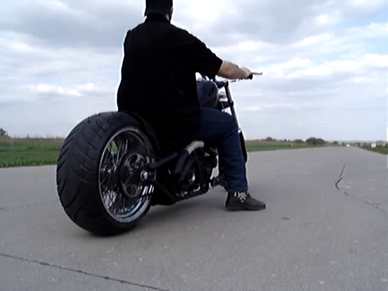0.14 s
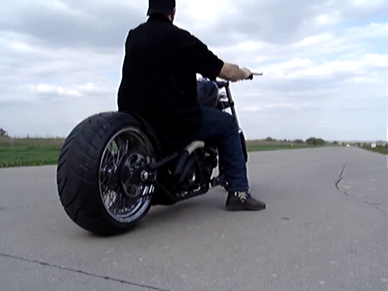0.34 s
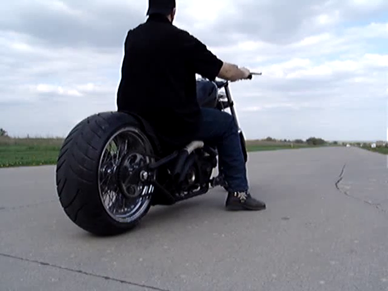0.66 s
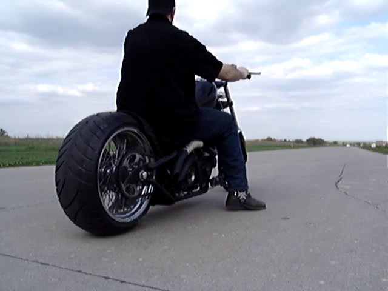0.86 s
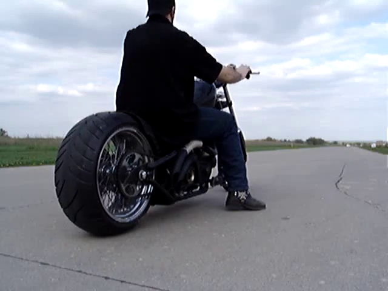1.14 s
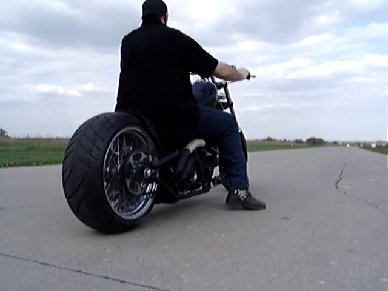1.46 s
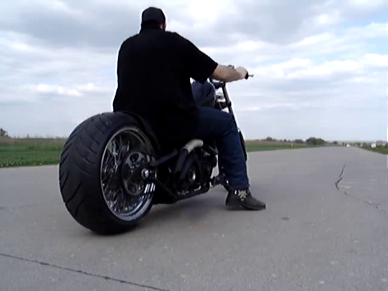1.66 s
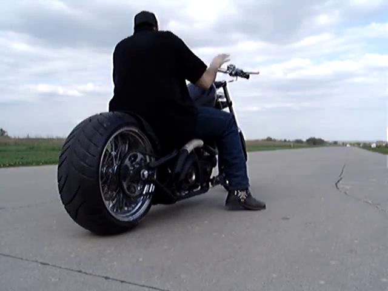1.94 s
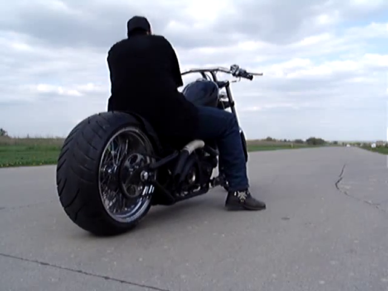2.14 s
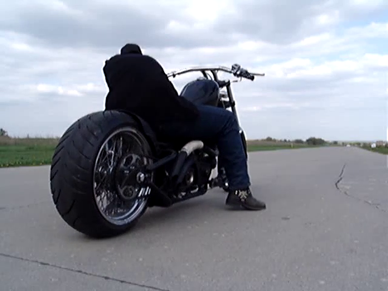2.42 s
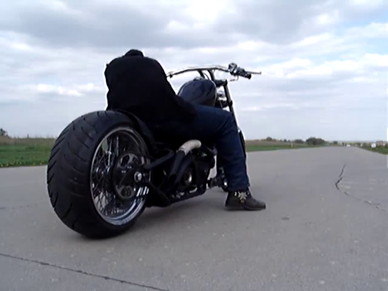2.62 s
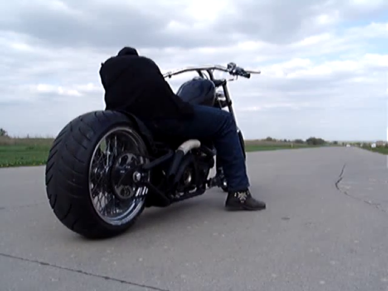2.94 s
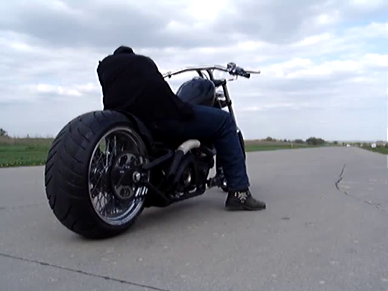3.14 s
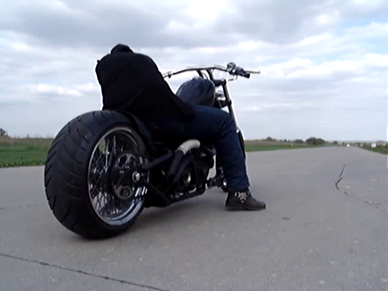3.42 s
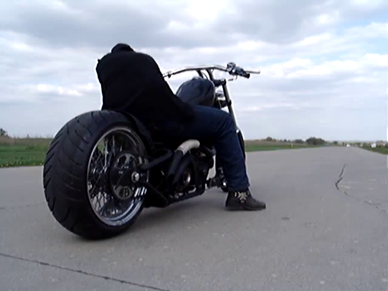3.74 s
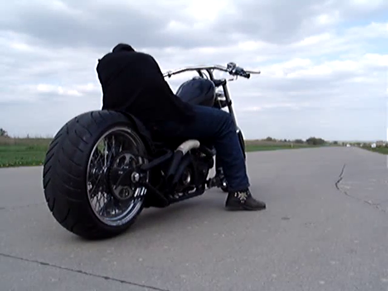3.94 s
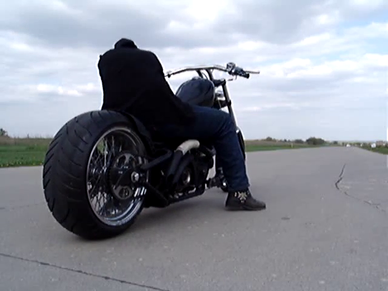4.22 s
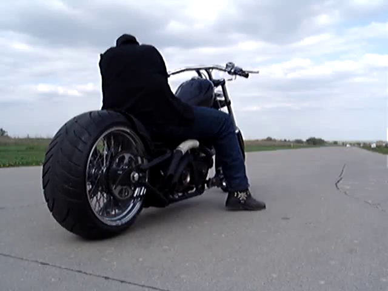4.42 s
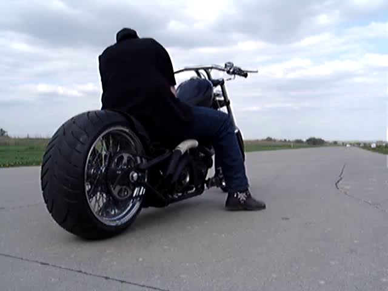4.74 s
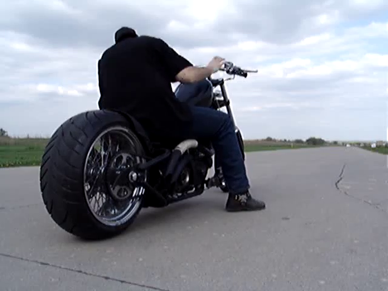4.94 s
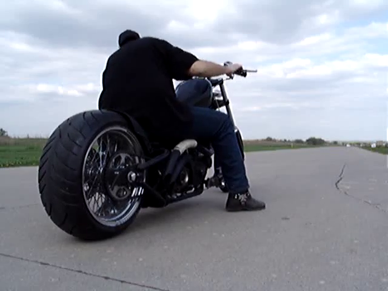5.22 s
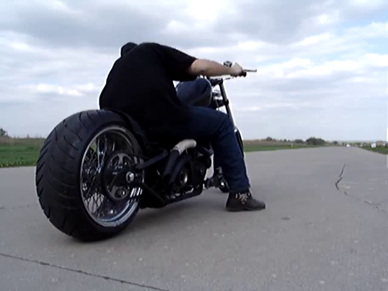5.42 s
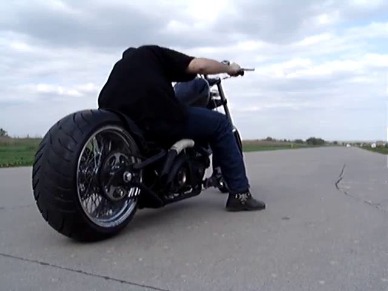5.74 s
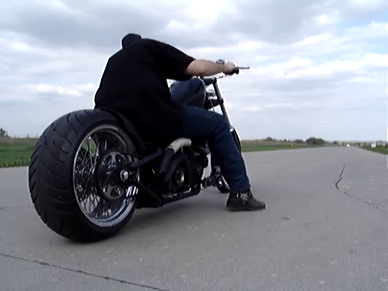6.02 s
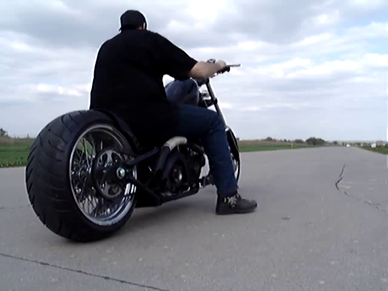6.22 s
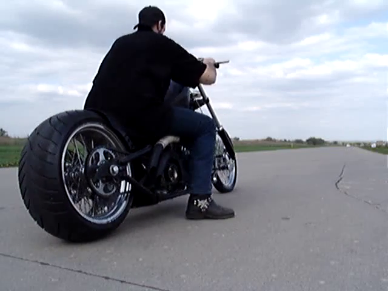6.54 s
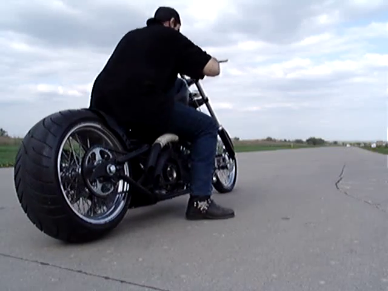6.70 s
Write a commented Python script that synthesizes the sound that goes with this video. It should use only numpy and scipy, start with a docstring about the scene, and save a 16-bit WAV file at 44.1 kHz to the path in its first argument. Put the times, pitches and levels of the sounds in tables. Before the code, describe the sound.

A large twin-cylinder motorcycle idles on an open road, a few metres from a small microphone. Short open pipes crack sharply about eight times a second, each pop bright and dry over a brief hollow boom. The second cylinder mostly gives soft puffs, sometimes a quick double pop. Low gulping tones slide upward between beats, and engine clatter flutters behind. It never revs up or pulls away.

```python
"""A big V-twin motorcycle idles with a lope on an open road, a few metres from a small microphone.
Each firing cracks out of a short open pipe as a jet of noise and sets its air column ringing.
The first cylinder sets the beat and seldom misses; the second mostly gives only a soft puff of noise.
Late in every engine cycle the pipes gulp, a tone sliding up to a crest, heavily about every fourth time.
Behind lie the engine's clatter and hiss, one knock of the pipe wall, and air rumbling past the microphone."""
import sys
import numpy as np
from scipy import signal
from scipy.fft import rfft, irfft
from scipy.io import wavfile
from scipy.ndimage import uniform_filter1d

SR = 44100
rng = np.random.default_rng(int(sys.argv[2]) if len(sys.argv) > 2 else 0)


def materialize(psi):
    """Save the field psi as 16-bit PCM at rate SR to the path in sys.argv[1].

    A 1-D psi becomes a single channel; in a 2-D psi each row is a channel.
    """
    bounded = np.clip(np.atleast_2d(psi).T, -1, 1)
    quanta = np.round(bounded * 32767).astype(np.int16)
    wavfile.write(sys.argv[1], SR, quanta)


N = 302967  # samples

# Full firings: start_s, cylinder (1 or 2), relative level_db, bark pitch_hz
FIRINGS = [(0.069, 1, -17.5, 2560), (0.184, 1, -27.5, 3620), (0.235, 2, -17.5, 4160), (0.302, 1, -14, 3540),
           (0.532, 1, -13.5, 3500), (0.757, 1, -13.5, 3460), (0.984, 1, -13.5, 3380),
           (1.093, 1, -13.5, 3340), (1.209, 1, -13.5, 3470), (1.34, 1, -15.5, 3460),
           (1.406, 2, -15.5, 2800), (1.509, 1, -15.5, 3370), (1.65, 1, -11.5, 3630), (1.78, 1, -11.5, 3350),
           (1.917, 1, -12.5, 3400), (1.973, 2, -18.5, 3400), (2.049, 1, -14, 3230), (2.18, 1, -17.5, 2650),
           (2.321, 1, -14.5, 3730), (2.372, 2, -17, 3530), (2.44, 1, -17.5, 2700), (2.567, 1, -13, 2610),
           (2.69, 1, -15.5, 3320), (2.814, 1, -15, 2330), (2.865, 2, -32.5, 3000), (2.936, 1, -11.5, 3400),
           (3.065, 1, -13, 3250), (3.198, 1, -14.5, 2360), (3.248, 2, -19, 2740), (3.313, 1, -16, 3150),
           (3.436, 1, -14, 2650), (3.553, 1, -19.5, 3400), (3.677, 1, -15, 2750), (3.727, 2, -33.5, 2980),
           (3.91, 1, -12.5, 3320), (4.022, 1, -12.5, 2170), (4.136, 1, -16, 2260), (4.184, 2, -18.5, 2620),
           (4.247, 1, -13, 2650), (4.364, 1, -17, 2570), (4.489, 1, -15.5, 2740), (4.606, 1, -24, 2080),
           (4.73, 1, -13, 3280), (4.778, 2, -17, 3310), (4.841, 1, -13.5, 2620), (4.958, 1, -12.5, 3330),
           (5.077, 1, -18.5, 2180), (5.205, 1, -12, 2860), (5.254, 2, -15, 3900), (5.322, 1, -14.5, 3420),
           (5.441, 1, -14, 3520), (5.567, 1, -22, 2840), (5.701, 1, -13.5, 2730), (5.959, 1, -15, 2460),
           (6.009, 2, -20, 2720), (6.075, 1, -19.5, 2160), (6.198, 1, -14.5, 2580), (6.319, 1, -12, 2730),
           (6.443, 1, -14, 3150), (6.567, 1, -12.5, 2640), (6.752, 2, -21, 1840), (6.83, 1, -12, 1900)]

# Spectra of the firing's gas noises, before scaling: pitch_hz, relative level_db
BARK_SPECTRUM = [(150, -52.5), (400, -7), (750, -9.5), (1300, -22), (1700, -12.5), (2200, -9), (2700, -5.5),
                 (3450, -4.5), (4200, -10.5), (5500, -15), (9000, -27)]
SIZZLE_SPECTRUM = [(2500, -14.5), (4200, -8.5), (5200, 11), (6500, 9.5), (7400, 12), (9700, 8),
                   (12000, -27)]
AFTERFLOW_SPECTRUM = [(120, -23.5), (400, 8), (750, 9), (1300, 21), (2100, 27), (3500, -1), (5200, -9),
                      (7000, -31.5), (10000, -36.5)]
# Cross modes of the pipe, rung by the streaming gas: pitch_hz, width_hz, relative level_db
CROSS_MODES = [(1077, 37, 10.5), (2180, 44, 9), (2560, 115, 9)]
# Odd quarter-wave modes of the pipe, rising as the piston comes up, before the scatter of each firing:
# first pitch_hz, pitch_hz after one stroke, relative level_db
PIPE_MODES = [(82.7, 122, -4), (199.7, 362, -3), (410.3, 545, -14.5), (586, 640, -17.5), (742.4, 860, -17)]

# Spectrum of the soft puffs: pitch_hz, relative level_db
PUFF_SPECTRUM = [(300, -15.5), (1200, -9.5), (2200, 7), (3300, 8), (5000, 1.5), (8000, 1.5), (10000, 0.5)]
# Heavy gulps of the lope: crest_s, relative level_db
HEAVY_GULPS = [(0.269, -18), (0.835, -19), (1.454, -29.5), (1.741, -22.5), (2.008, -22.5), (2.404, -20),
               (2.898, -17.5), (3.279, -18.5), (3.755, -17.5), (4.216, -19), (4.81, -20), (5.287, -20),
               (5.66, -26.5), (6.04, -17.5), (6.406, -23.5), (6.794, -20.5)]
# Spectrum of the gas rushing in a gulp: pitch_hz, relative level_db
RUSH_SPECTRUM = [(120, -3.5), (300, -7.5), (430, -1), (750, -22), (1300, -28), (5000, -49)]
# Modes of the knocked pipe wall: pitch_hz, level_db, time to fall 60 dB t60_s
WALL_MODES = [(780, -13.5, 0.052), (1226, -11, 0.044), (1530, -22, 0.072)]

# Spectra of the engine wash, the gas hiss and the air at the microphone: pitch_hz, relative level_db
CLATTER_SPECTRUM = [(20, -16), (42, -22.5), (65, -7), (95, 6), (170, 2), (260, 0), (380, 0), (750, -4.5),
                    (1000, -11.5), (1230, -11), (1500, -11), (3200, -24.5), (5500, -59), (10000, -62.5)]
HISS_SPECTRUM = [(1500, -23.0), (3500, 19.5), (6000, 1), (10000, -5)]
RUMBLE_SPECTRUM = [(10, -6), (25, -2.0), (45, -3.5), (90, -25.5), (400, -83.0)]

CYCLE_S = 0.123  # one engine cycle (two turns of the crank) at the usual idle speed
# Sizzle against the bark (dB): first cylinder, second, and the first when it fires just after the second
SIZZLE_FIRST_DB, SIZZLE_SECOND_DB, SIZZLE_AFTER_DB = -2.0, 2.5, -4.0
BOOM_FIRST_DB, BOOM_SECOND_DB = -21.5, -27.0
# Puffs come at a set share of every cycle, or at its start when the first cylinder misses
PUFF_SHARE, PUFF_DB, MISFIRE_DB, PUFF_SCATTER_DB = 0.443, -33.5, -39.5, 5
# Ordinary gulps grow as the engine speeds up (dB per cycle a second); levels on the scale of HEAVY_GULPS
GULP_SHARE, GULP_DB, GULP_DB_PER_RATE, GULP_SCATTER_DB = 0.718, -32, 4, 1.5
# A stronger gulp crests higher: mean pitch at GULP_DB, and its rise
GULP_HZ, GULP_HZ_PER_DB = 165.2, 2.5
KNOCK_S = 2.373


def cracks(sputter_db=2.5):
    """The valve opens: a sputtering jet barks and sizzles for a few ms, then duller gas streams after it."""
    t, out = around(), np.zeros(N)
    previous_s = -1
    for start_s, cylinder, level_db, bark_hz in FIRINGS:
        if round(cylinder) == 2:
            sizzle_offset_db = SIZZLE_SECOND_DB
        elif start_s - previous_s < .07:
            sizzle_offset_db = SIZZLE_AFTER_DB
        else:
            sizzle_offset_db = SIZZLE_FIRST_DB
        sputter = amp(sputter_db * wobble(len(t), count=40))

        jet = noise(BARK_SPECTRUM, len(t)) * burst(t, at=0.0012, rise=0.00079, fall=0.0043) * sputter
        bark = levelled(jet + 2.0 * resonate(jet, bark_hz, width=167), level_db + 1.42)

        fizz = noise(SIZZLE_SPECTRUM, len(t)) * burst(t, at=0.0022, rise=0.00079, fall=0.0023) * sputter
        # each fizz is tinted by one narrow resonance at a random high pitch
        tint = resonate(fizz, rng.uniform(4510, 9880), width=320)
        sizzle = levelled(fizz + 3.45 * tint, level_db + sizzle_offset_db)

        stream = noise(AFTERFLOW_SPECTRUM, len(t)) * burst(t, at=0.0012, rise=0.0011, fall=0.0095)
        rung = sum(amp(db) * resonate(stream, hz, width) for hz, width, db in CROSS_MODES)
        # the afterflow varies only half as much in dB as the bark
        afterflow = levelled(pipe_echo(stream + rung), 0.5 * level_db - 16.0)

        add(out, start_s, bark + sizzle + afterflow)
        previous_s = start_s
    return out


def pipe_echo(x, trip=.006, kept=0.22):
    """Sound runs up and down the pipe (trip in s) and flips its sign at the open end."""
    delay = round(trip * SR)
    return sum((-kept) ** k * np.pad(x, (k * delay, 0))[:len(x)] for k in range(5))


def booms(stroke=0.0394, lead=0.0013, thud_hz=150, front_hz=700, waver=.05):
    """The pressure front rings the pipe; its suction echo thuds, and a second thud follows as the valve closes."""
    t, out = around(), np.zeros(N)
    age = np.maximum(t + lead, 0)
    swell = 1 - np.exp(-age / 0.0054)
    held = swell / (1 + np.exp((age - stroke - .004) / 0.0094))

    def thud(at, length):
        return -np.cos(2 * np.pi * thud_hz * (t - at)) * np.exp(-((t - at) / length) ** 2)

    suction = amp(-0.5) * thud(at=0.0062, length=0.0027)
    closing = amp(1.5) * thud(at=0.0293, length=0.0041)
    for start_s, cylinder, _, _ in FIRINGS:
        # each mode's pitch is scattered a little on its own from firing to firing
        detune = 1 + 0.0457 * rng.standard_normal(len(PIPE_MODES))
        ring = np.zeros(len(t))
        for (low_hz, high_hz, db), factor in zip(PIPE_MODES, detune):
            rising_hz = low_hz + (high_hz - low_hz) * np.minimum(age / stroke, 1.2)
            hz = factor * rising_hz * (1 + waver * wobble(len(t), count=300))
            phase = 2 * np.pi * np.cumsum(hz * (age > 0)) / SR
            ring += amp(db + 2 * rng.standard_normal()) * np.cos(phase)
        # the front's pitch scatters along with the lowest mode, about twice as far
        front = np.sin(2 * np.pi * front_hz * detune[0] ** 2 * age) * np.exp(-age / 0.012)
        # the second cylinder, right after the first, meets a pipe that is already flowing and booms less
        boom_db = BOOM_SECOND_DB if round(cylinder) == 2 else BOOM_FIRST_DB
        add(out, start_s, amp(boom_db) * (ring * held + suction + closing) + amp(-29.0) * front)
    return out


def gulps(ring_hz=175, slide=0.029, steepening=0.52):
    """The closing valve pulls the air column up in pitch; it crests, then rings on in the shut pipe."""
    t, out = around(), np.zeros(N)
    skirt = np.exp(-abs(t) / 0.024)
    crest = np.exp(-((t + 0.0003) / 0.0042) ** 2)
    ordinary = each_cycle(GULP_SHARE, GULP_DB, GULP_SCATTER_DB, unless=HEAVY_GULPS,
                          db_per_rate=GULP_DB_PER_RATE)
    for crest_s, db in list(HEAVY_GULPS) + ordinary:
        crest_hz = GULP_HZ + GULP_HZ_PER_DB * (db - GULP_DB) + 7 * rng.standard_normal()
        hz = np.where(t < .005, crest_hz * np.exp(np.minimum(t, 0) / slide), ring_hz)
        turns = np.cumsum(np.maximum(hz, 85)) / SR
        angle = 2 * np.pi * (turns - turns[np.argmin(abs(t))])  # zero at the crest

        peaked = np.clip(0.64 + 0.042 * (db + 22.5), 0, .9)  # strong gulps gather into one short crest
        height = amp(db + 10.0) * (peaked * crest + (1 - peaked) * skirt)
        pointed = steepening * height ** 2 * np.cos(3 * angle)  # strong waves grow pointed
        wave = height * np.cos(angle) + pointed

        rush = noise(RUSH_SPECTRUM, len(t)) * burst(t, at=-0.0042, rise=0.014, fall=0.0082)
        add(out, crest_s, wave + amp(0.45 * db - 21.5) * rush)
    return out


def puffs(ping_hz=1240):
    """A weak charge leaves the pipe as a longer, soft hiss; its valve pings faintly."""
    t, out = around(), np.zeros(N)
    leak = burst(t, at=0.00096, rise=.0016, fall=0.01)
    ping = np.sin(2 * np.pi * ping_hz * t) * burst(t, at=0.0011, rise=.0005, fall=0.009)
    misfires = each_cycle(0, MISFIRE_DB, PUFF_SCATTER_DB, unless=FIRINGS)
    soft = each_cycle(PUFF_SHARE, PUFF_DB, PUFF_SCATTER_DB, unless=FIRINGS)
    for start_s, db in misfires + soft:
        add(out, start_s, amp(db) * noise(PUFF_SPECTRUM, len(t)) * leak + amp(-46) * ping)
    return out


def knock():
    """One firing knocks the pipe wall, whose modes ring briefly as decaying sines."""
    t, out = around(), np.zeros(N)
    age = np.maximum(t, 0)
    ring = sum(amp(db - 60 * age / t60) * np.sin(2 * np.pi * hz * age) for hz, db, t60 in WALL_MODES)
    add(out, KNOCK_S, ring)
    return out


def clatter(wash_db=-34.5, flutter_db=3.0, hiss_db=-56, hiss_flutter_db=5.5):
    """Valve gear, chain and gas flow: a wash and a fainter hiss of noise that flutter together."""
    flutter = unit(uniform_filter1d(uniform_filter1d(rng.standard_normal(N), 500), 200))
    hiss = amp(hiss_db + hiss_flutter_db * flutter) * noise(HISS_SPECTRUM, N)
    wash = amp(wash_db + flutter_db * flutter) * noise(CLATTER_SPECTRUM, N)
    return wash + hiss


def rumble():
    """Air moving past the microphone: steady, very low noise."""
    return amp(-68.5) * noise(RUMBLE_SPECTRUM, N)


def beats():
    """Cycle starts (s): the first cylinder's firings, the flywheel coasting evenly through its misses."""
    fired = [start_s for start_s, cylinder, _, _ in FIRINGS if round(cylinder) == 1]
    fired = [fired[0] - CYCLE_S] + fired
    runs = [np.linspace(a, b, round((b - a) / CYCLE_S), endpoint=False) for a, b in zip(fired, fired[1:])]
    return np.concatenate(runs + [fired[-1:]])


def each_cycle(share, db, scatter_db, unless, db_per_rate=0):
    """Rows (s, dB) at one share of every cycle, scattered as no two burn alike, unless a row is near."""
    starts, lengths = beats()[:-1], np.diff(beats())
    speedup = 1 / lengths - 1 / CYCLE_S  # cycles a second above the usual idle
    levels = db + db_per_rate * speedup + scatter_db * rng.standard_normal(len(starts))
    rows = zip(starts + share * lengths, levels)
    return [(s, level) for s, level in rows if min(abs(s - row[0]) for row in unless) > CYCLE_S / 5]


def amp(db):
    """Amplitude factor of a level in dB."""
    return 10 ** (np.asarray(db) / 20)


def unit(x):
    """Scales a signal to rms 1."""
    return x / np.sqrt(np.mean(x ** 2) + 1e-20)


def levelled(x, db):
    """Scales a blow to the level it has when its energy is spread over 10 ms."""
    return amp(db) * x / np.sqrt(np.sum(x ** 2) / (SR / 100))


def around():
    """Time axis (s) of one event, from 50 ms before it to 100 ms after."""
    return np.arange(-.05, .1, 1 / SR)


def add(mix, s, sound):
    """Mixes in an event whose time axis is around(), with its zero at s."""
    start = round((s + around()[0]) * SR)
    sound = sound[max(-start, 0):]
    part = mix[max(start, 0):][:len(sound)]
    part += sound[:len(part)]


def burst(t, at, rise, fall):
    """An envelope of height 1 that swells and dies exponentially around a moment (all in s)."""
    shape = np.exp(-np.logaddexp((at - t) / rise, (t - at) / fall))
    return shape / shape.max()


def wobble(size, count):
    """A random curve of rms 1, smoothed twice over count samples."""
    return unit(uniform_filter1d(uniform_filter1d(rng.standard_normal(size), count), count))


def noise(spectrum, size):
    """Noise of rms 1 with the given spectrum, interpolated over log frequency."""
    hz, db = np.transpose(spectrum)
    gain = amp(np.interp(np.log(np.fft.rfftfreq(size, 1 / SR) + 1), np.log(hz), db))
    return unit(irfft(rfft(rng.standard_normal(size)) * gain, size))


def resonate(x, hz, width):
    """One resonance of gain 1: a complex pole whose damping sets its width in Hz."""
    pole = np.exp((2j * np.pi * hz - np.pi * width) / SR)
    return 2 * signal.lfilter([1 - abs(pole)], [1, -pole], x).real


def scene():
    """The motorcycle a few metres away, as one channel."""
    return (cracks() + booms() + gulps() + puffs() + knock() + clatter())[None]


def record(dry, ceiling=0.82, bass_hz=68, order=4, edge_hz=10180):
    """The small microphone loses deep bass and flattens the tallest cracks; then the band limit."""
    low_pass = signal.firwin(201, edge_hz, window=("kaiser", 7), fs=SR)[None]
    high_pass = signal.butter(order, bass_hz, "highpass", fs=SR, output="sos")
    thinned = signal.sosfiltfilt(high_pass, dry)
    heard = signal.oaconvolve(thinned, low_pass, "same")
    flattened = heard / (1 + (heard / ceiling) ** 4) ** .25
    return signal.oaconvolve(flattened + rumble(), low_pass, "same")


dry = scene()
out = record(dry)
materialize(out)
```